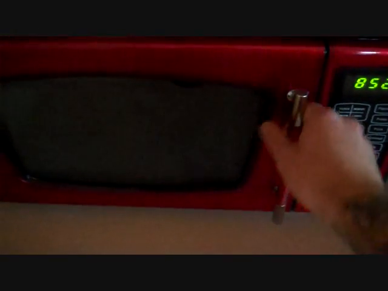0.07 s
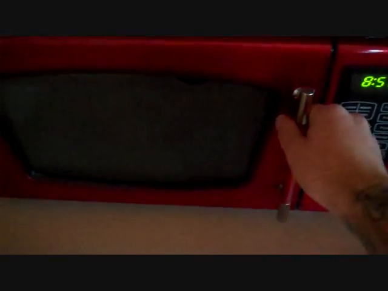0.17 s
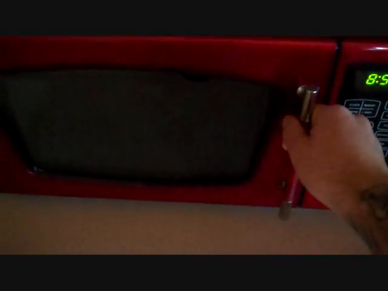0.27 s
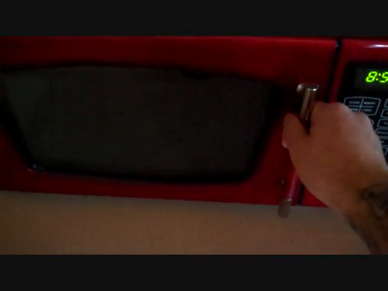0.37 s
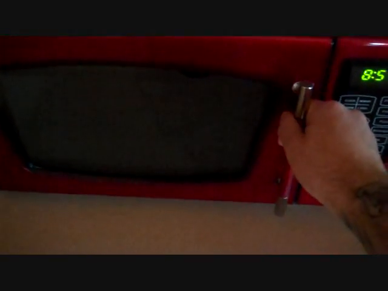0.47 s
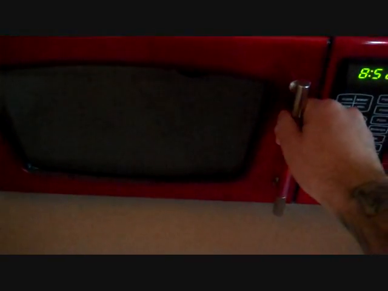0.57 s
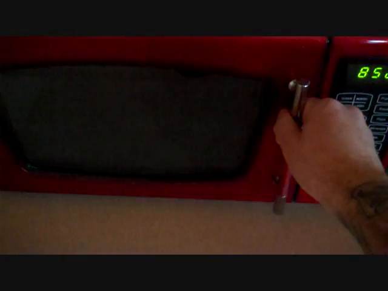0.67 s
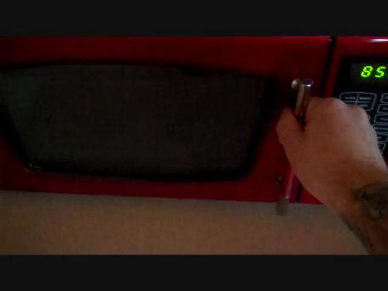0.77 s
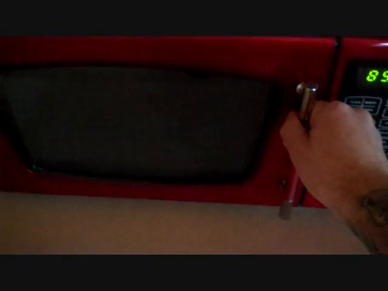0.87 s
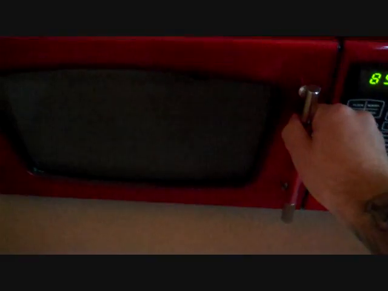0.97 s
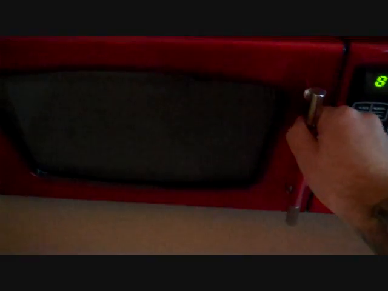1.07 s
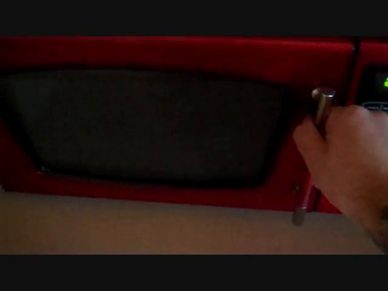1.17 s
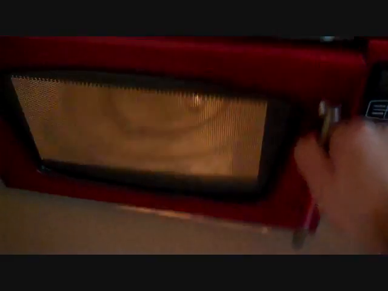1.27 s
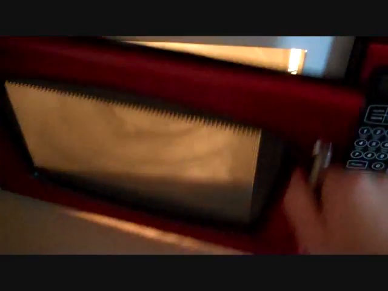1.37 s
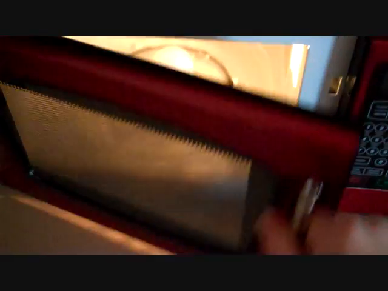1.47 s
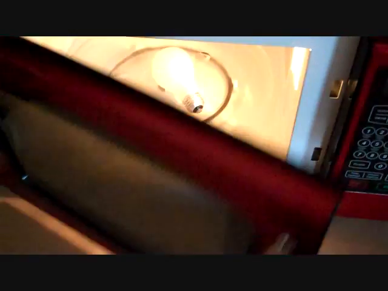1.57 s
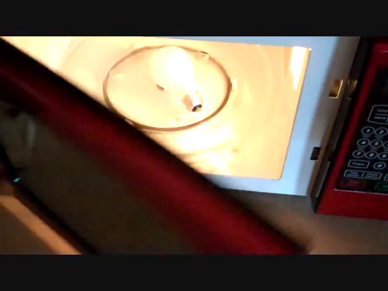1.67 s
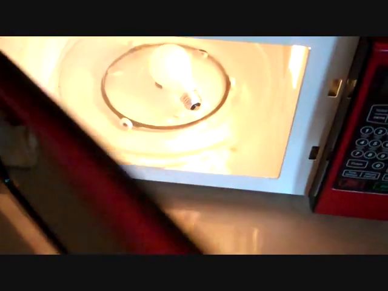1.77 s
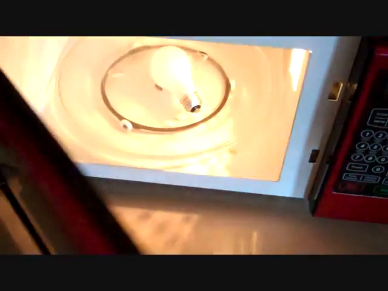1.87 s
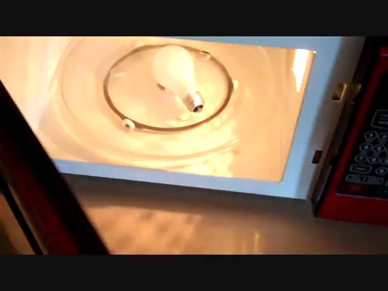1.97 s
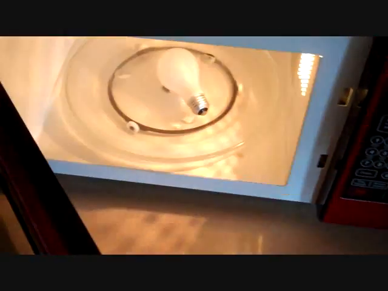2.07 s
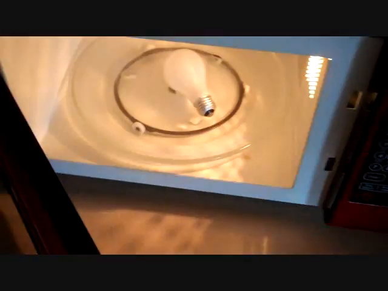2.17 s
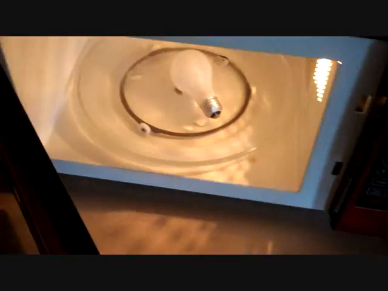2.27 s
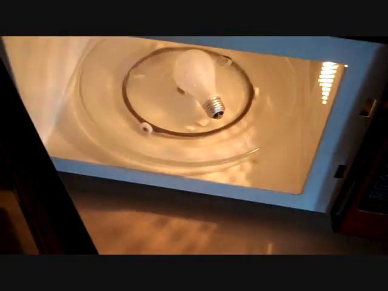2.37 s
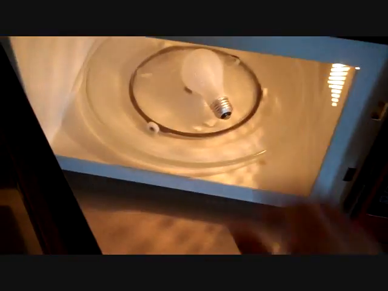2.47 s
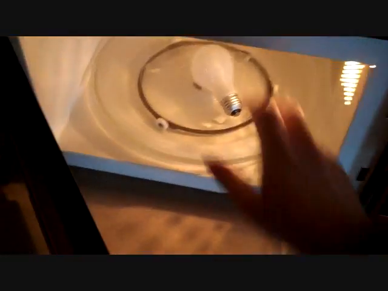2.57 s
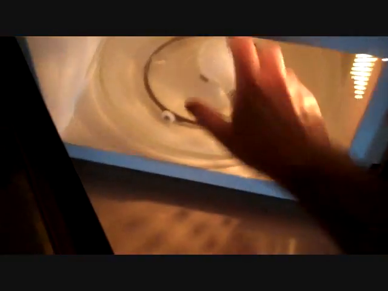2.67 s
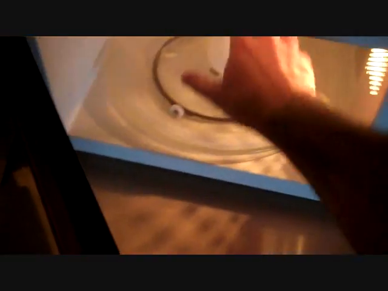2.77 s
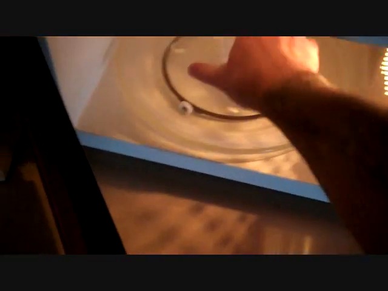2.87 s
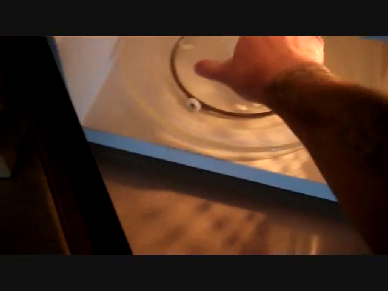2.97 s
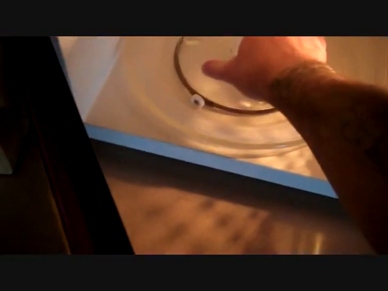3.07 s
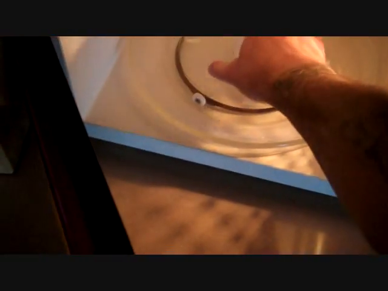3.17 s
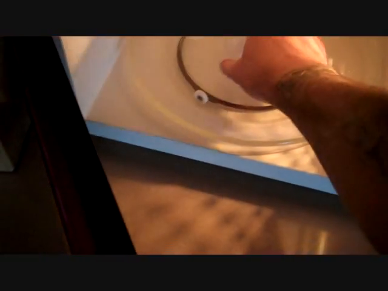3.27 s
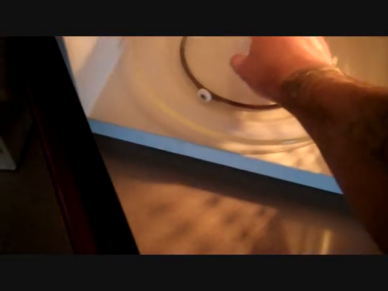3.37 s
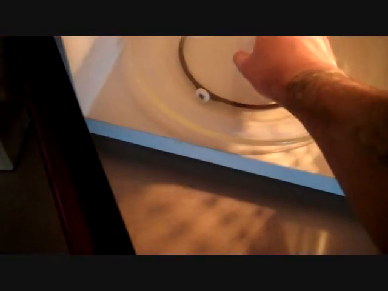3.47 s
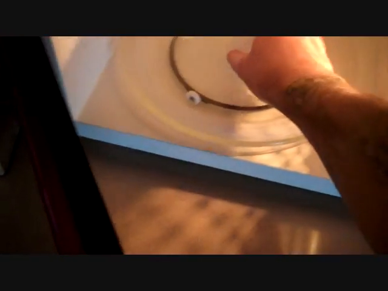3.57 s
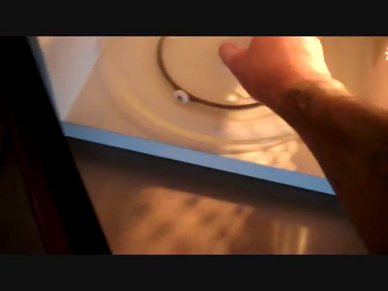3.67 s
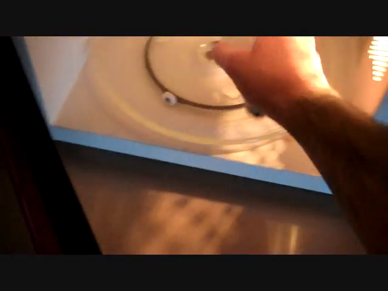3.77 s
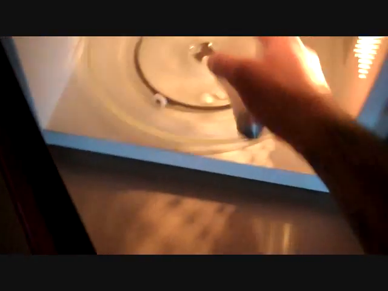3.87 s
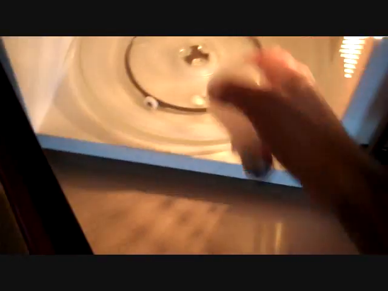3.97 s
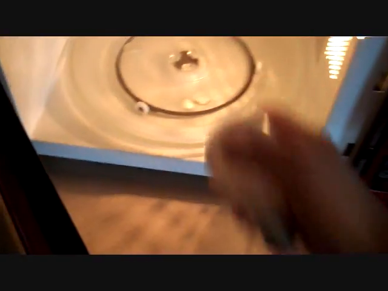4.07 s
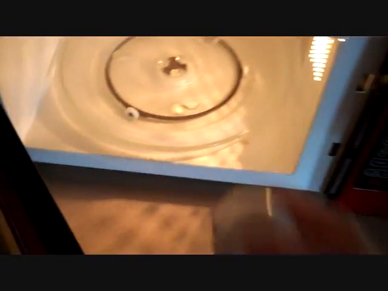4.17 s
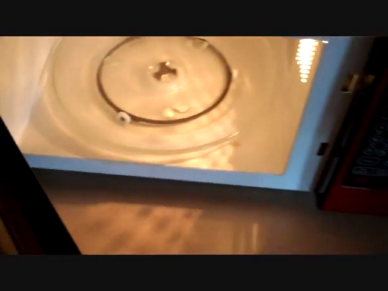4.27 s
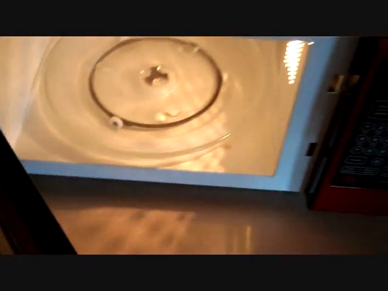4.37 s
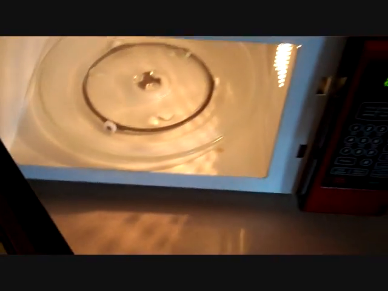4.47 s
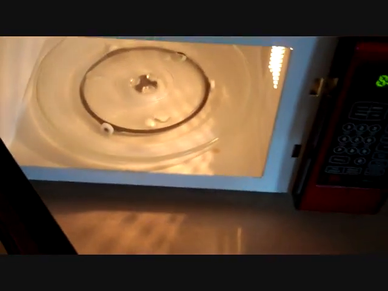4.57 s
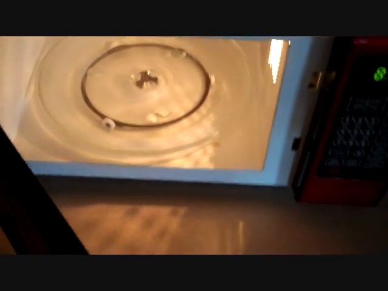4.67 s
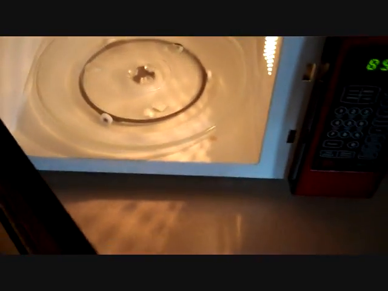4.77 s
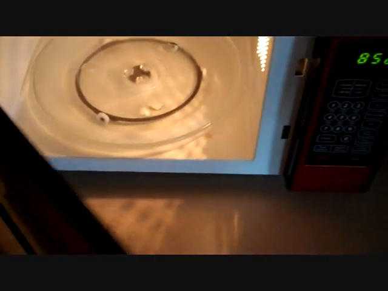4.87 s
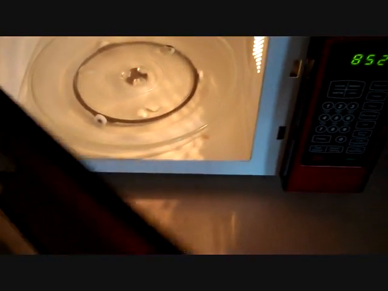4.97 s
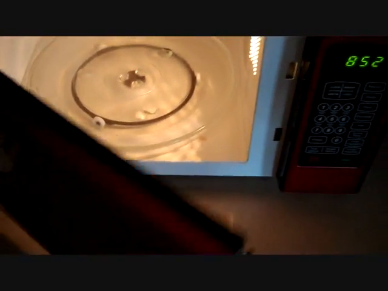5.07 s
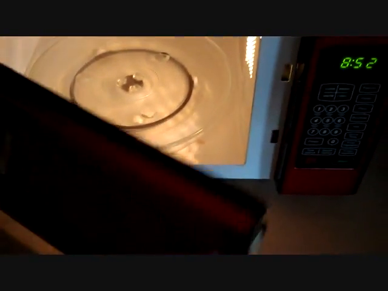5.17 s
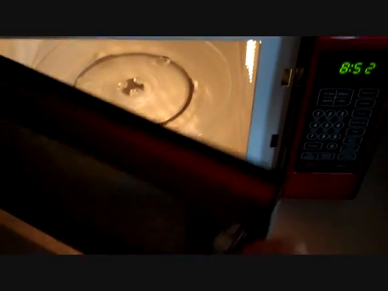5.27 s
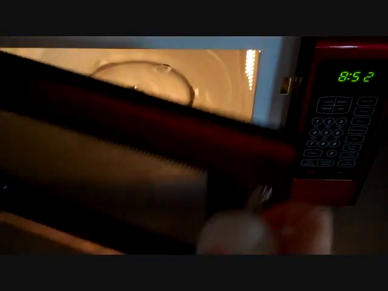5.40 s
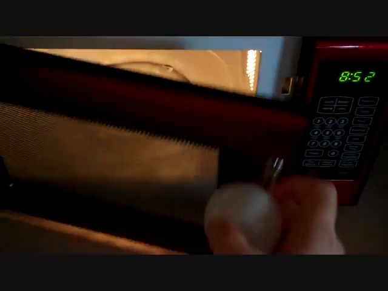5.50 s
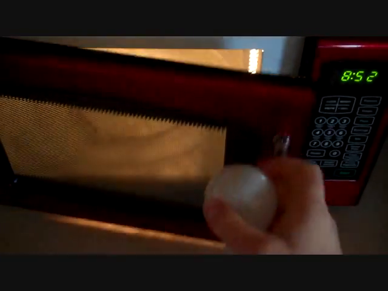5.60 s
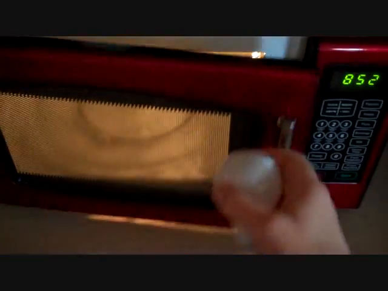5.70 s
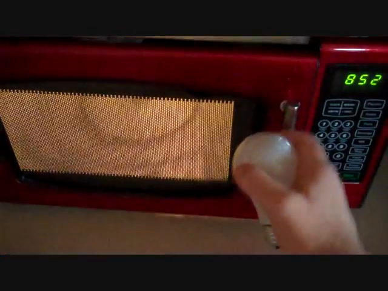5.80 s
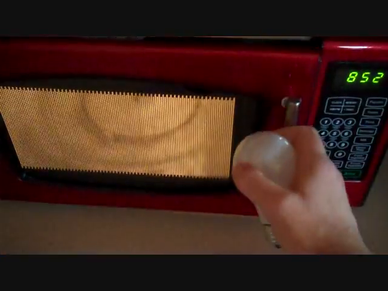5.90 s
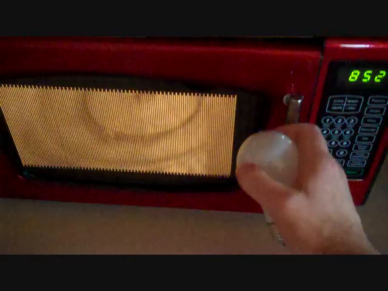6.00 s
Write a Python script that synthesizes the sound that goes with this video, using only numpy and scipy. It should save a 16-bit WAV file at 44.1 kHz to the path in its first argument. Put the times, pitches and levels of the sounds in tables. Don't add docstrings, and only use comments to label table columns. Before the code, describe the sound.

Close, slightly hissy stereo, brighter on the left: light handle taps on a hollow metal door, a hard clattering latch release, a run of small hinge ticks with a thin high spring ring and a faint low hum. Quiet room hush follows. Then a short glass scrape ends in a hard bright clink, tiny wires tinkle, a bulb knocks the door dully, and the door thuds closed, rattling, with modest kitchen echo.

```python
import sys
import numpy as np
from scipy import signal
from scipy.fft import rfft, irfft, next_fast_len
from scipy.io import wavfile
from scipy.ndimage import uniform_filter1d

SR = 44100
rng = np.random.default_rng(int(sys.argv[2]) if len(sys.argv) > 2 else 0)


def generate_wav(signal):
    frames = np.transpose(np.atleast_2d(signal))
    scaled = np.clip(frames, -1, 1) * 32767
    pcm = np.round(scaled).astype(np.int16)
    wavfile.write(sys.argv[1], SR, pcm)


def natural_amplitude(level_db):
    exponent = np.asarray(level_db, float) / 20
    return 10 ** exponent


N = 266275
BANDS_HZ = 60 * 2.0 ** np.arange(9)


def on_log(table, hz):
    f, v = np.transpose(table)
    return np.interp(np.log(np.maximum(hz, 1)), np.log(f), v)


def curve(table):
    s, *columns = np.transpose(table)
    t = np.arange(N) / SR
    running = (t > s[0]) & (t < s[-1])
    gate = uniform_filter1d(1.0 * running, size=400)
    return [np.interp(t, s, c) for c in columns] + [gate]


def shape(x, gain):
    size = next_fast_len(x.shape[-1])
    spectrum = rfft(x, size) * gain(np.fft.rfftfreq(size, 1 / SR))
    return irfft(spectrum, size)[..., :x.shape[-1]]


def unit(x):
    return x / np.sqrt(np.mean(x ** 2, axis=-1, keepdims=True))


def fade(t, t60):
    return np.exp(-np.log(1000) * t / np.maximum(t60, 1e-3))


def add(out, s, x):
    i = int(s * SR)
    out[i:i + len(x)] += x[:N - i]


def octave(f, hz):
    return np.exp(-2 * np.log2(np.maximum(f, 1) / hz) ** 2)


def bump(f, hz, width, db):
    return natural_amplitude(db / (1 + (2 * (f - hz) / width) ** 2))


def ring(force, modes, rise=0.00101):
    t = np.arange(2 * SR) / SR
    body = np.zeros(len(t))
    for k, (hz, db, t60) in enumerate(modes):
        body += (-1) ** k * natural_amplitude(db) * fade(t, t60) * np.sin(2 * np.pi * hz * t)
    return signal.fftconvolve(force, body * np.minimum(t / rise, 1))[:N]


# frequency in Hz, level in dB per Hz.
AIR_COLOUR = [(15, -44.5), (25, -13.5), (136, -14.5), (164, -10.5), (373, -8), (404, -14), (438, -3),
              (527, -11.5), (744, -8.5), (919, -13), (1260, -12.5), (2950, -15.5), (14100, -22)]
# frequency in Hz, share of the hush common to both ports.
AIR_ALIKE = [(60, -0.17), (130, 0.25), (290, 0.39), (630, -0.2), (1390, -0.083), (3050, -0.12),
             (6700, -0.16), (14700, 0.00086)]
# frequency in Hz, left minus right in dB.
AIR_BALANCE = [(60, 9.5), (110, -3), (200, 8.5), (380, 5), (690, 7.5), (1280, 8.5), (2350, 6), (4330, 4.5),
               (7980, 12), (14700, -3.5)]


def air(level_db=-62):
    common, *own = rng.standard_normal((3, N))
    alike = lambda f: np.clip(on_log(AIR_ALIKE, f), 0, 1)
    ports = []
    for noise, side in zip(own, (1, -1)):
        mixed = shape(common, lambda f: np.sqrt(alike(f))) + shape(noise, lambda f: np.sqrt(1 - alike(f)))
        colour = lambda f: natural_amplitude(on_log(AIR_COLOUR, f) + side * on_log(AIR_BALANCE, f) / 2)
        ports.append(shape(mixed, colour))
    out = np.array(ports)
    wander = unit(uniform_filter1d(rng.standard_normal(N), size=9000))
    return out * natural_amplitude(level_db + 0.5 * wander) / np.sqrt(np.mean(out.mean(axis=0) ** 2))


# frequency in Hz, time to lose 60 dB in seconds.
KITCHEN_T60 = [(60, 0.21), (300, 1), (1000, 0.75), (3000, 0.44), (8000, 0.53), (14000, 0.24)]


def kitchen(x, wet_db):
    t = np.arange(int(0.8 * SR)) / SR
    left, other = rng.standard_normal((2, len(t)))
    alike = lambda f: 1 / (1 + (f / 900) ** 2)
    right = shape(left, alike) + shape(other, lambda f: np.sqrt(1 - alike(f) ** 2))
    noise = np.array([left, right])
    echo = np.zeros(noise.shape)
    for hz in BANDS_HZ:
        echo += shape(noise, lambda f: octave(f, hz)) * fade(t, on_log(KITCHEN_T60, hz))
    echo = echo * np.minimum(t / 0.027, 1)
    return natural_amplitude(wet_db) * signal.fftconvolve(x[None], echo, axes=1)[:, :N]


# start in seconds, level in dB.
HUM = (1.33, -48)
# frequency in Hz, level in dB, time to lose 60 dB in seconds.
CAVITY = [(383, 0, 3.8)]


def hum():
    end_s, stop_t60_s = 2.28, 0.5
    start_s, db = HUM
    force = np.zeros(N)
    add(force, start_s, natural_amplitude(np.array([db])))
    stop = fade(np.maximum(np.arange(N) / SR - end_s, 0), stop_t60_s)
    waver = unit(uniform_filter1d(rng.standard_normal(N), size=2000))
    return ring(force, CAVITY, rise=0.05) * stop * natural_amplitude(2.5 * waver)


# start in seconds, level in dB.
SPRING = [
    (1.39, -45),
    (1.5, -52),
    (1.65, -46.5),
    (1.78, -54),
    (1.98, -59),
]
# start in seconds, level in dB, frequency in Hz.
SPRING_LOW = (1.46, -50, 5225)


def spring():
    spring_hz, t60_s, rise_s = 5835, 0.8, 0.05
    strength, low = np.zeros(N), np.zeros(N)
    t = np.arange(SR) / SR
    pluck = fade(t, t60_s) * np.minimum(t / rise_s, 1)
    for s, db in SPRING:
        add(strength, s, natural_amplitude(db) * pluck)
    s, db, hz = SPRING_LOW
    add(low, s, natural_amplitude(db) * pluck * np.sin(2 * np.pi * hz * t))
    return np.sqrt(2) * strength * np.sin(2 * np.pi * spring_hz * np.arange(N) / SR) + low


# start in seconds, level in dB.
THUMB = [
    (0.913, -27),
    (1.043, -28),
]
# frequency in Hz, level in dB, time to lose 60 dB in seconds.
THUMB_NOTE = [(414, 0, 0.056)]


def thumb():
    force = np.zeros(N)
    for s, db in THUMB:
        add(force, s, natural_amplitude(np.array([db])))
    return ring(force, THUMB_NOTE, rise=0.0067)


# start in seconds, level in dB, frequency in Hz.
TINKLE = [(3.9, -53.5, 6770), (3.926, -56.5, 6350), (3.949, -58, 6770), (3.994, -53.5, 7110),
          (4.015, -52.5, 5210), (4.028, -58.5, 7500), (4.267, -49, 6570), (4.532, -61, 6480)]


def tinkle():
    length_s = 0.033
    out = np.zeros(N)
    t = np.arange(4096) / SR
    swell = np.sin(np.pi * np.minimum(t / length_s / 2, 1)) ** 2
    for s, db, hz in TINKLE:
        shiver = unit(shape(rng.standard_normal(len(t)), lambda f: 1 / (1 + ((f - hz) / 90) ** 2)))
        add(out, s - length_s / 2, natural_amplitude(db) * shiver * swell)
    return out


# time in seconds, level in dB.
DRAG = [(3.205, -66.5), (3.229, -50.5), (3.236, -37.5), (3.275, -32), (3.3, -25), (3.35, -42), (3.4, -57.5),
        (3.415, -43), (3.436, -73.5)]
# start in seconds, level in dB, contact in ms.
TAPS = [
    (3.4457, -32, 0.12),
    (3.478, -4, 0.01),
    (3.495, -27, 0.061),
]
PLATE_HZ = (689, 915, 1042, 1125, 1180, 1250, 1672, 1918, 1956, 2015, 2088, 2191, 2580, 2680, 2888, 2955,
            3240, 3320, 3620, 4090, 4680, 5310, 5480, 6090, 6320, 6940, 7310, 7693, 8190, 8533)
# level in dB when tapped, time to lose 60 dB in seconds, level in dB when dragged over.
PLATE_RING = [(-17.5, 0.48, -14.5), (-6.5, 0.066, -7), (4, 0.05, 7.5), (-11.5, 0.46, -9),
              (-2.5, 0.15, -11.5), (-7, 0.18, -6.5), (-15.5, 0.32, -17.5), (-2, .11, -9),
              (-18.5, 0.63, -16), (-7.5, 0.22, -20.5), (1, 0.23, -4.5), (-34, .4, -22.5), (-11, 0.14, -25),
              (-21, 0.056, -11), (-8, 0.1, -38), (-3.5, 0.12, -13), (-23.5, 0.085, -26.5),
              (-3, 0.15, -29.5), (-25.5, 0.11, -20), (-28.5, 0.23, -25), (-20.5, 0.15, -35),
              (-13.5, 0.16, -11.5), (-9, 0.068, -28.5), (-45, 0.47, -22.5), (-21, .12, -18.5),
              (-10, 0.17, -18), (-27.5, 0.19, -16.5), (-22, 0.52, -33.5), (-20, 0.24, -26.5),
              (-23.5, 0.0923, -33.5)]
# frequency in Hz, level in dB.
GLASS_NOISE = [(150, -39.5), (380, -15.5), (520, -34), (800, -6.5), (1150, -2), (1470, -15.5), (2050, -4.5),
               (3300, -14.5), (3950, -19), (5300, -20.5), (5850, -24), (8000, -25.5), (8900, -35.5),
               (9900, -22), (11000, -46.5)]


def plate():
    tap_db, t60, drag_db = np.transpose(PLATE_RING)
    db, gate = curve(DRAG)
    sparse = rng.random(N) < 0.1
    grains = unit(rng.standard_normal(N) * natural_amplitude(0.9 * rng.exponential(size=N)) * sparse)
    dull = signal.lfilter([0.3], [1, -0.7], grains)
    drag_treble_db = -16
    slip = gate * natural_amplitude(db - 14.0) * (dull + natural_amplitude(drag_treble_db + 12.5) * (grains - dull))
    force, clatter = np.zeros(N), natural_amplitude(29.5) * slip
    t = np.arange(6000) / SR
    for s, peak_db, contact_ms in TAPS:
        push = np.exp(-t / (max(contact_ms, 0.01) * 0.00099))
        add(force, s, natural_amplitude(peak_db - 3.5) * push / push.sum())
        noise = rng.standard_normal(len(t)) * fade(t, 0.17) * np.minimum(t / 0.00038, 1)
        add(clatter, s, natural_amplitude(peak_db + 7) * noise)
    tapped = ring(force, zip(PLATE_HZ, tap_db, 0.8 * t60), rise=0.0016)
    dragged = ring(slip, zip(PLATE_HZ, drag_db, 0.34 * t60))
    clear = shape(tapped + dragged, lambda f: 1 / (1 + (560 / np.maximum(f, 1)) ** 6))
    clear = clear + natural_amplitude(-29) * ring(force, [(374, -9, 0.38)], rise=0.02)
    return np.array([shape(clatter, lambda f: natural_amplitude(on_log(GLASS_NOISE, f))), clear])


def blows(events, colour, modes, ring_db, longer, lateness, note_db, crack_db, thud_db, deeper_db,
          chatter_db=0.5):
    out, force = np.zeros(N), np.zeros(N)
    t = np.arange(12288) / SR
    f = np.fft.rfftfreq(len(t), 1 / SR)
    body = natural_amplitude(on_log(colour, f))
    shares = body * octave(f, BANDS_HZ[:, None]) / np.sqrt(np.mean(body[f > 2500] ** 2))
    below = 5000 / BANDS_HZ[:, None]
    onset = np.minimum(t / (lateness * below), 1)
    crack = natural_amplitude(crack_db) * fade(t, 0.0023 * below)
    for s, tick_db, knock_db, t60, hz in events:
        low_db = thud_db + deeper_db * np.log2(1000 / hz)
        noise = rng.standard_normal((2, len(t)))
        chatter = natural_amplitude(chatter_db * unit(uniform_filter1d(noise[1], size=60)))
        bands = irfft(rfft(noise[0]) * bump(f, hz, 0.089 * hz, note_db) * shares)
        gain = natural_amplitude(on_log([(240, low_db), (1000, knock_db), (3800, 0)], BANDS_HZ))[:, None]
        tail = fade(t, t60 * below ** longer) + crack
        add(out, s, natural_amplitude(tick_db) * chatter * (gain * bands * tail * onset).sum(axis=0))
        push = 4 * (t == 0) + 0.4 * noise[1] * fade(t, 0.01)
        add(force, s, natural_amplitude(tick_db + knock_db) * push)
    return np.array([out, natural_amplitude(ring_db) * ring(force, modes)])


# start in seconds, tick in dB, extra knock in dB, boom in dB.
KNOCKS = [
    (4.6512, -50, -8, -65),
    (4.842, -30, 4, -41),
    (5.1999, -43.5, 7, -57),
    (5.3296, -18, 6.5, -43),
]


def boom():
    boom_hz, rise_s, t60_s = 231.2, 0.047, 0.25
    out, t = np.zeros(N), np.arange(SR // 2) / SR
    swell = fade(t, t60_s) * np.minimum(t / rise_s, 1) ** 2
    for s, _, _, db in KNOCKS:
        hz = boom_hz * (1 + 0.061 * unit(uniform_filter1d(rng.standard_normal(len(t)), size=900)))
        add(out, s, natural_amplitude(db + 12) * np.sin(2 * np.pi * np.cumsum(hz) / SR) * swell)
    return out


# frequency in Hz, level in dB per Hz.
DOOR_COLOUR = [(50, -46), (130, -29), (230, -29.5), (500, -14.5), (1000, -11), (1900, -7.5), (3000, -18),
               (4500, -16.5), (7500, -15.5), (10500, -27.5), (14100, -34.5)]
# frequency in Hz, level in dB, time to lose 60 dB in seconds.
DOOR = [(477, -13, 0.2), (860, -4, 0.05), (990, 6, .045), (1426, -5, .03), (1944, -6, .025),
        (2615, -9, 0.022), (4486, -6.5, 0.025)]


def knocks():
    fade_s, note_hz = 0.043, 990
    events = [(s, tick_db, knock_db, fade_s, note_hz) for s, tick_db, knock_db, _ in KNOCKS]
    return blows(events, DOOR_COLOUR, DOOR, ring_db=-16, longer=0.59, lateness=0.00159,
                 note_db=2, crack_db=-26.0, thud_db=6.5, deeper_db=0)


# start in seconds, tick in dB, extra knock in dB, fade in seconds, note in Hz.
SHUT = [
    (5.8855, -18.5, -18, 0.041, 3537),
    (5.8892, -13.5, 0, 0.074, 960),
]
# extra knock in dB, fade in seconds, note in Hz.
RATTLE = (0.86, 0.11, 1600)
# frequency in Hz, level in dB per Hz.
SHUT_COLOUR = [(24, -50), (40, -22), (69, -13.5), (183, -15), (278, -22.5), (595, -10.5), (640, -12),
               (1590, -5.5), (2240, -9), (8020, -20), (14100, -45)]


def shut(count=5):
    first_s, first_db, gap_s, loss_db = 5.9135, -27.5, 0.0235, 5.5
    bounces = [(first_s + k * gap_s, first_db - k * loss_db, *RATTLE) for k in range(count)]
    return blows(SHUT + bounces, SHUT_COLOUR, DOOR, ring_db=-16.5, longer=0.45, lateness=0.0017,
                 note_db=2, crack_db=-16.0, thud_db=-2, deeper_db=4, chatter_db=2.5)


# frequency in Hz, level in dB, time to lose 60 dB in seconds.
CASE = [(813, -16, .5), (953, -13, .35), (1044, -15, .3), (1685, -12, .18)]
# start in seconds, level in dB.
HINGE = [(1.461, -45), (1.5495, -45.5), (1.6272, -48), (1.6578, -44.5), (1.7376, -48), (1.7508, -47),
         (1.7849, -44.5), (1.8388, -44), (1.8941, -48), (1.9487, -39.5), (2.0058, -40.5), (2.059, -39.5),
         (2.405, -72)]
# extra knock in dB, fade in seconds, note in Hz.
HINGE_LOOSE = (-6.5, 0.18, 530)
HINGE_TIGHT = (0.5, 0.13, 1990)
# frequency in Hz, level in dB per Hz.
HINGE_COLOUR = [(29, -50.5), (50, -29), (346, -12), (381, -9), (518, -19.5), (773, -6.5), (1180, -8),
                (1940, -3.5), (3110, -4.5), (7810, -8), (14100, -46)]


def hinge():
    loaded_s, free_s = 1.745, 2.1
    events = [(s, db, *(HINGE_TIGHT if loaded_s < s < free_s else HINGE_LOOSE)) for s, db in HINGE]
    return blows(events, HINGE_COLOUR, CASE, ring_db=-45.5, longer=0.69, lateness=0.00075,
                 note_db=6.5, crack_db=-10, thud_db=2.5, deeper_db=6)


# frequency in Hz, level in dB, time to lose 60 dB in seconds.
CASE_LOW = [(416, -12, .55)]
# start in seconds, tick in dB, extra knock in dB, fade in seconds, note in Hz.
GRIP = [(0.0034, -42, -8, 0.047, 400), (0.0754, -28, -18, 0.029, 8200), (0.1337, -47, -6, 0.049, 1520),
        (0.3303, -35.5, -6.5, 0.21, 1700), (0.352, -24, -10, 0.075, 3880), (0.4269, -41.5, 1, 0.05, 4180),
        (0.45, -37, -1, 0.041, 1530), (0.4624, -43.5, 7.5, 0.24, 1550), (0.4835, -34.5, 8.5, 0.06, 770),
        (0.5132, -41.5, -1, 0.1, 1520), (0.5606, -33.5, 2.7, 0.036, 855), (0.5733, -38.5, -5, 0.11, 1040),
        (0.698, -50.5, -21.5, 0.1, 7640), (0.7535, -55, -16.5, 0.1, 7800), (0.9099, -40.5, 4.5, 0.09, 407),
        (0.9199, -37, -0.5, 0.018, 390), (1.0144, -40, -2.5, 0.18, 1520), (1.0338, -36, -1, 0.047, 1240),
        (1.0494, -38, -7, 0.015, 404)]
# frequency in Hz, level in dB per Hz.
GRIP_COLOUR = [(29, -47.5), (50, -36), (148, -8.5), (315, -18.5), (418, -5.5), (640, -10), (912, -2.5),
               (1100, -7), (1570, -4), (3190, -10), (7630, -11), (14100, -39)]


def grip():
    return blows(GRIP, GRIP_COLOUR, CASE_LOW + CASE, ring_db=-35.5, longer=0.58, lateness=0.00055,
                 note_db=7.5, crack_db=-0.5, thud_db=0.5, deeper_db=2)


# start in seconds, tick in dB, extra knock in dB, fade in
# seconds, note in Hz.
LATCH = [(1.2492, -39, 2.5, 0.22, 433), (1.269, -29, 6.5, 0.14, 830), (1.2878, -18, -8.5, 0.095, 7400),
         (1.2935, -16.5, -24, 0.13, 3930), (1.3242, -8, -5.5, 0.13, 3270), (1.3374, -21.5, 17, 0.013, 770),
         (1.3639, -18.5, 7, 0.099, 1680), (1.3748, -20, 2, 0.1, 1200), (1.3905, -26.5, 7.5, 0.16, 1840),
         (1.4109, -34.5, 3, 0.098, 770),
         (1.3245, -9, -6.5, 0.023, 2690),
]
# frequency in Hz, level in dB per Hz.
LATCH_COLOUR = [(24, -51), (40, -30.5), (124, -8.5), (217, -15.5), (432, -4), (553, -11.5), (760, -3),
                (2860, -4.5), (3310, -3), (4450, -6), (8020, -5), (10800, -17), (14100, -18)]


def latch():
    return blows(LATCH, LATCH_COLOUR, CASE_LOW + CASE, ring_db=-26.5, longer=0.47, lateness=0.0005,
                 note_db=8, crack_db=0.0, thud_db=6.5, deeper_db=7.5, chatter_db=-2.0)


# frequency in Hz, width in Hz, level in dB.
LEFT_PORT = (7890, 1300, 7)
# frequency in Hz, level in dB against the left.
RIGHT_PORT = [(60, -8), (400, -7), (1200, -8.5), (4000, -8), (5500, -9), (8000, -17), (11000, -24),
              (14000, -22)]


def scene():
    bursts, rings = grip() + latch() + hinge() + knocks() + shut()
    clatter, clear = plate()
    to_room = bursts + natural_amplitude(-21.5) * rings + natural_amplitude(2.5) * clatter + natural_amplitude(-8.0) * clear
    echo = kitchen(to_room, wet_db=-45.5)
    direct = bursts + rings + clatter + clear + spring() + tinkle() + boom() + hum() + thumb()
    paths = rng.standard_normal(200) * fade(np.arange(200) / SR, 0.01)
    scattered = signal.fftconvolve(direct, paths / np.sqrt(np.sum(paths ** 2)))[:N]
    straight = lambda f: 1 / (1 + (f / 5000) ** 4)
    shaded = shape(direct, straight) + shape(scattered, lambda f: np.sqrt(1 - straight(f) ** 2))
    left = shape(direct + echo[0], lambda f: bump(f, *LEFT_PORT))
    right = shape(shaded + echo[1], lambda f: natural_amplitude(on_log(RIGHT_PORT, f)))
    return natural_amplitude(-4.0) * np.array([left, right]) + air()


def low_pass(x):
    return signal.sosfilt(signal.butter(12, 15310, fs=SR, output="sos"), x)


def record(dry):
    ceiling, top_hz = 0.9, 14200
    clipped = np.clip(dry, -ceiling, ceiling)
    mix = shape(clipped, lambda f: np.where(f < top_hz, 1, natural_amplitude(-29.5)))
    return low_pass(mix)


dry = scene()
out = record(dry)
generate_wav(out)
```